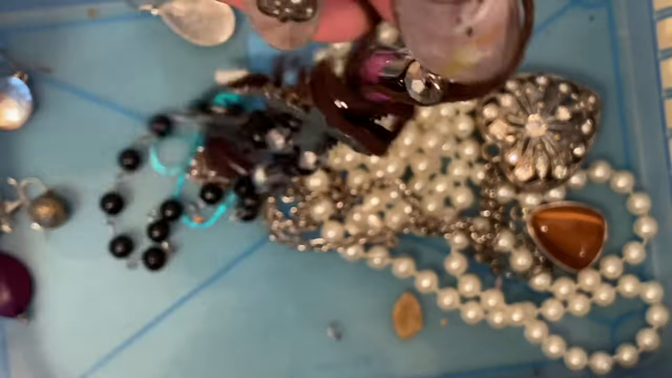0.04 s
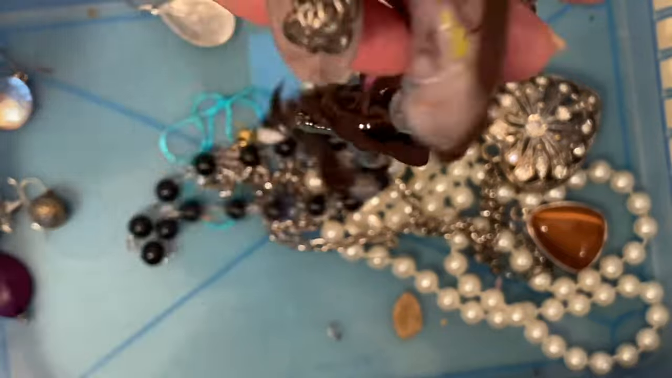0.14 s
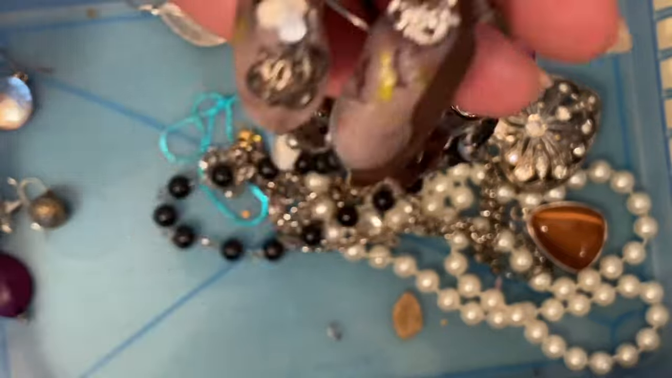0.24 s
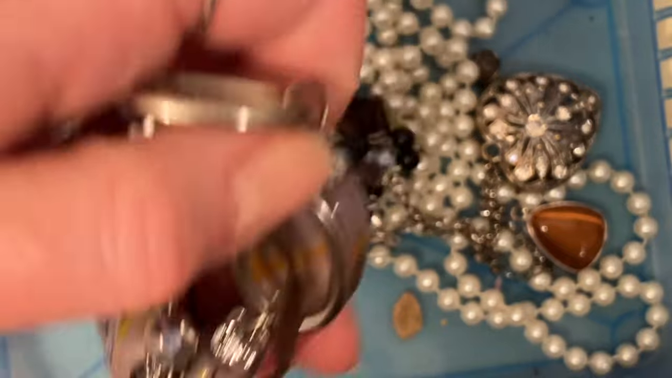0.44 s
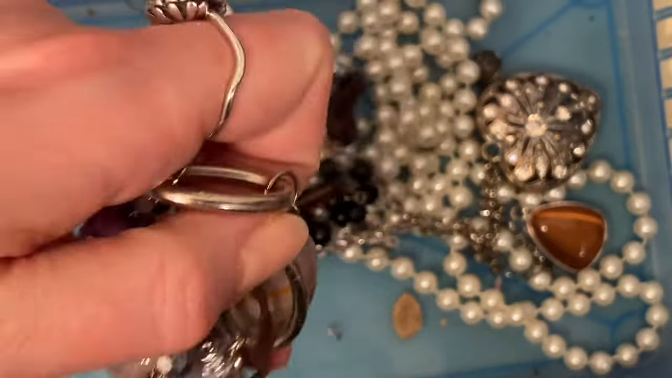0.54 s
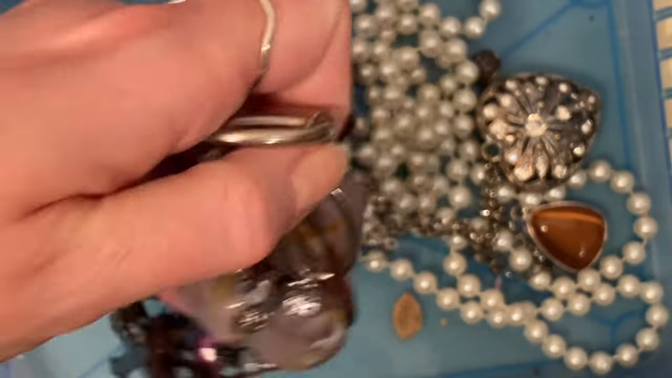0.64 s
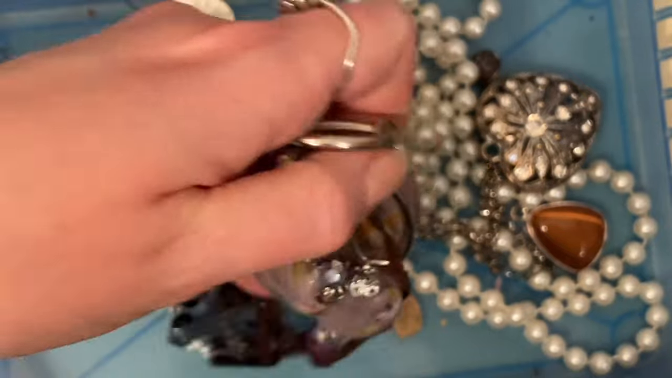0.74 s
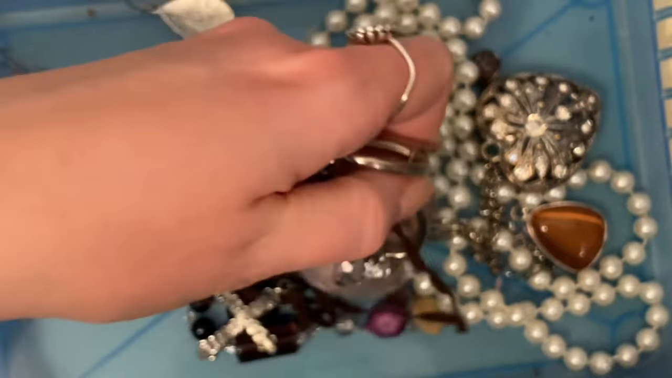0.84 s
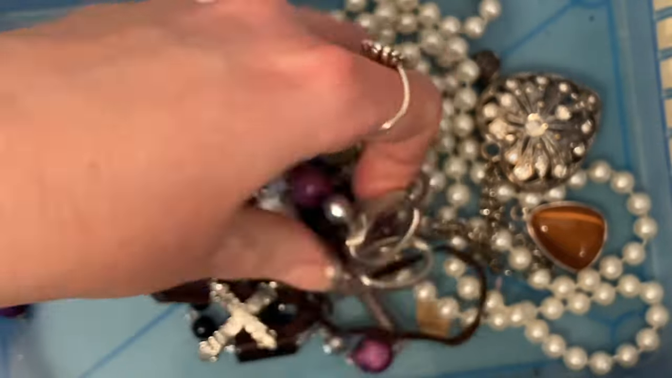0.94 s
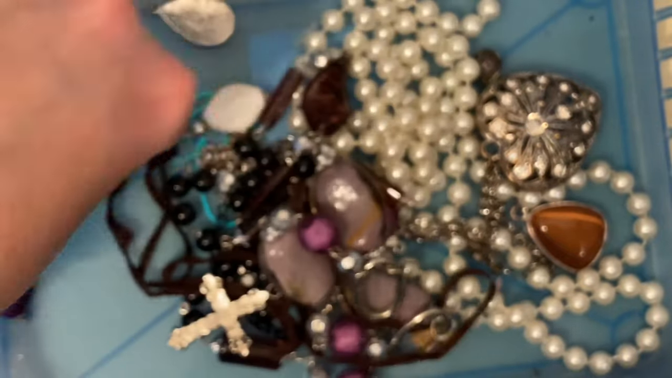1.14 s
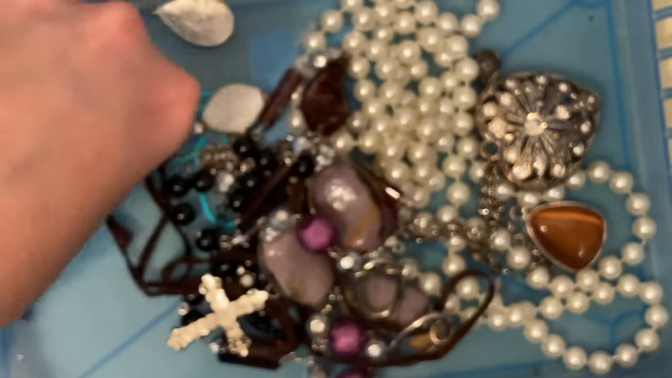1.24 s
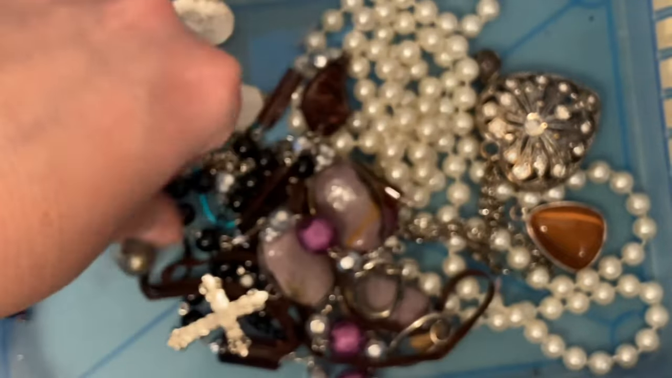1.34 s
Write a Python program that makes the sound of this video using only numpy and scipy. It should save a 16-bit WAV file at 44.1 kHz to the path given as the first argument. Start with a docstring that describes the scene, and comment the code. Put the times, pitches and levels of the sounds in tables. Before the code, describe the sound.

A handful of jewellery rattles and drops into a plastic tub with dense, bright clicks and low thumps

```python
"""Beads and chains in a plastic tub

A handful of beads, pearls and chains is lifted, turned and dropped in a plastic tub, close to a two-port
microphone. Each contact gives a short knock near 2 kHz, a noisy bright tick and a shiver of the heap.
Countless tiny damped sines rattle between them, and heavy pieces ring the tub floor in a few low modes.
A low murmur of the room lies underneath. The loudest contacts clip.
"""
import sys
import numpy as np
from scipy.fft import rfft, irfft, next_fast_len
from scipy.io import wavfile

SR = 44100
rng = np.random.default_rng(int(sys.argv[2]) if len(sys.argv) > 2 else 0)


def inscribe(sig):
    """Save sig as 16-bit PCM at rate SR to the path in sys.argv[1].

    A 1-D sig is mono; a 2-D sig holds one channel per row.
    Samples are clipped to [-1, 1] before scaling.
    """
    pcm = np.round(np.clip(np.atleast_2d(sig).T, -1, 1) * 32767)
    wavfile.write(sys.argv[1], SR, pcm.astype(np.int16))


N = 59535
TOP_HZ = 15700  # band limit of the microphone; no bead or link is pitched above it


def amp(db):
    """Decibels to gain."""
    return 10 ** (np.asarray(db) / 20)


def unit(x):
    """Scaled to rms 1."""
    return x / np.sqrt(np.mean(x ** 2) + 1e-20)


def along(points, hz):
    """Read (frequency, value) points on a log frequency axis."""
    point_hz, values = np.transpose(points)
    return np.interp(np.log(hz + 1), np.log(np.maximum(point_hz, 0) + 1), values)


def filtered(x, response):
    """x shaped by a complex response of frequency."""
    size = next_fast_len(N + 8192)  # spare room keeps the tail from wrapping round
    spectrum = rfft(x, size) * response(np.fft.rfftfreq(size, 1 / SR))
    return irfft(spectrum, size)[..., :N]


def noise(spectrum):
    """Coloured noise of rms 1."""
    white = rng.standard_normal(N)
    return unit(filtered(white, lambda hz: amp(along(spectrum, hz))))


def place(times, rows):
    """Sum short sounds, one per row, at their times in seconds."""
    starts = np.round(np.asarray(times) * SR).astype(int)[:, None]
    at = starts + np.arange(rows.shape[1])
    return np.bincount(at.ravel(), rows.ravel(), N + SR)[:N]


# The low murmur of the room: pitch_hz, level_db
ROOM_SPECTRUM = [(33, -11.5), (48, 1), (230, -17.5), (395, -5.5), (1500, -41)]
ROOM_DB = -45


def room():
    """Steady noise, coloured towards the lows."""
    return amp(ROOM_DB) * noise(ROOM_SPECTRUM)


def grains(per_s, hz, spread, cycles, size_db):
    """Random tiny collisions of rms 1, each a damped sine of its own pitch and size."""
    count = int(per_s * N / SR)
    start_s = rng.random(count) * N / SR
    draw = np.clip(rng.standard_normal((count, 2)), -2, 2)
    pitch_hz = np.minimum(hz * np.exp(spread * draw[:, :1]), TOP_HZ)
    turns = pitch_hz * np.arange(256) / SR
    decay = amp(size_db * draw[:, 1:] - 30 * turns / cycles)  # falls 30 dB in this many cycles
    shape = decay * (1 - np.exp(-2 * turns))
    return unit(place(start_s, shape * np.sin(2 * np.pi * turns)))


# Colour of the smooth rustle under the beads: pitch_hz, level_db
RUSTLE_SPECTRUM = [(1000, -12.5), (1900, -2.5), (3500, -6), (5000, -9.5), (15500, -51)]
RUSTLE_DB = -4.5  # against the patter


def beads():
    """An even patter of small bead knocks over a smooth rustle of noise."""
    patter = grains(per_s=700, hz=2050, spread=0.21, cycles=2.14, size_db=3)
    return patter + amp(RUSTLE_DB) * noise(RUSTLE_SPECTRUM)


# How strongly the handful stirs close to the microphone: start_s, beads_db, links_db
STIRRING = [(0, -31.5, -43.5), (.12, -35, -41), (0.32, -38.5, -49), (.47, -38.5, -41.5),
            (0.571, -18, -28.5), (.63, -28, -33.5), (.705, -29, -45), (0.759, -21.5, -25.5),
            (0.859, -30, -38.5), (0.939, -14.5, -16.5), (1.019, -25.5, -26.5), (1.12, -33.5, -45),
            (1.233, -49.5, -60), (1.26, -28.5, -40), (1.35, -51, -73)]


def rattle():
    """Beads and brighter chain links in ceaseless small collisions, swelling and easing."""
    start_s, beads_db, links_db = np.transpose(STIRRING)
    t = np.arange(N) / SR
    links = grains(per_s=4500, hz=8100, spread=0.43, cycles=8.3, size_db=13.5)
    bead_gain = amp(np.interp(t, start_s, beads_db))
    link_gain = amp(np.interp(t, start_s, links_db))
    return bead_gain * beads() + link_gain * links


KNOCK_RISE_S, KNOCK_T60_S = 0.00034, 0.0061
OVERTONE_HZ, OVERTONE_SPREAD = 3403, 0.1  # spread in natural-log units
TICK_T60_S = 0.0083
SETTLE_DB, SETTLE_T60_S = -17, 0.041  # the heap shivers after each contact
# Colour of the noisy tick: pitch_hz, level_db
TICK_SPECTRUM = [(3500, -4.5), (5500, 5), (15500, -7)]
# Clear contacts, piece on piece: start_s, knock_db, pitch_hz, overtone_db, tick_db
CLEAR_CONTACTS = [(0.0115, -21, 1920, -44, -29), (0.0913, -19.5, 2120, -27, -19),
                  (0.1099, -15.5, 2320, -23, -30), (0.122, -18, 2420, -18.5, -17),
                  (0.177, -14, 1970, -26, -30), (0.1966, -12.5, 2010, -16, -14),
                  (0.2014, -27, 2200, -27, -9.5), (0.2195, -12.5, 1760, -14, -21),
                  (0.2438, -13.5, 1950, -33, -19), (0.349, -32, 2590, -30, -12.5),
                  (0.3753, -10, 2030, -18, -12.5), (0.3875, -11.5, 1940, -21, -24),
                  (0.3947, -27, 1910, -14.5, -26), (0.4005, -11.5, 1870, -15, -19),
                  (0.4291, -20, 1860, -16, -17.5), (0.442, -26, 1620, -12.5, -16.5),
                  (0.4855, -10, 1930, -30, -42), (0.4971, -12, 2230, -16, -17),
                  (0.5045, -8, 1960, -22, -32), (0.5096, -8, 1900, -23, -31), (0.5122, -10, 2050, -14, -24),
                  (0.533, -5.5, 1760, -17, -22), (0.538, -5, 2020, -14, -18.5),
                  (0.5495, -6.5, 2050, -7.5, -23), (0.5587, -3.5, 2350, -18, -18),
                  (0.5628, -1, 1930, -15, -30), (0.5759, 3, 2000, -22, -8), (0.5859, -6.5, 1920, -7, -29),
                  (0.5894, 0.5, 2000, -8.5, -7.5), (0.61, -7.5, 2080, -9, -15),
                  (0.6372, -7.5, 1750, -23, -32), (0.6457, -11, 2110, -27, -35),
                  (0.652, -9, 1960, -17.5, -32), (0.6601, -10.5, 2020, -34, -32),
                  (0.671, -8.5, 2040, -19, -21), (0.7102, -8.5, 2140, -19, -18),
                  (0.7192, 3, 1920, -2, -4.5), (0.7277, -3.5, 2120, -7, -21), (0.7424, -8, 1880, 2, -9),
                  (0.7455, -5, 1830, -8, -10), (0.758, -2.5, 1860, -9, -4), (0.7888, 0, 1670, 0.5, -5.5),
                  (0.823, -11, 2340, -9, -17), (0.832, 2, 1846, 2, -16), (0.8398, -4, 1650, -9, -15.5),
                  (0.8746, -9, 1740, -15, -18), (0.8899, -8.5, 2150, -18, -23), (0.8974, 4.5, 1860, -3, -4),
                  (0.9019, -17, 1920, -8, -3), (0.907, -1, 2050, -15, -22), (0.932, 5.5, 1980, 1, -1),
                  (0.94, -14, 1930, -11, -3), (0.9496, -8, 1650, -21, -5), (0.9549, 1.5, 1900, -4, -20),
                  (0.9597, -4.5, 1670, -6, -9), (0.966, -14, 2190, -0.5, -8.5),
                  (0.9859, -7.5, 2240, -7, -8), (1.0292, -12, 1810, -12, -34),
                  (1.0624, -14, 1470, -12, -38), (1.0665, -16, 2670, -12, -29),
                  (1.0771, -15, 1510, -19, -19), (1.0827, -5.5, 1710, -2.5, -33),
                  (1.1429, -13, 1580, -14, -43), (1.1687, -19.5, 2640, -19.5, -29),
                  (1.2454, -12, 2070, -13.5, -20.5), (1.306, -18.5, 1690, -21, -34)]


def contacts():
    """A knock on its own pitch with a pair of overtones, a noisy tick, then the shiver of the heap."""
    columns = np.transpose(CLEAR_CONTACTS)
    start_s, knock_db, pitch_hz, overtone_db, tick_db = (c[:, None] for c in columns)
    times = start_s[:, 0]
    t = np.arange(SR // 10) / SR

    over_hz = OVERTONE_HZ * np.exp(OVERTONE_SPREAD * rng.standard_normal((len(times), 2)))
    overtones = sum(np.sin(2 * np.pi * over_hz[:, [k]] * t) for k in range(2)) / 2
    tone = amp(knock_db) * np.sin(2 * np.pi * pitch_hz * t) + amp(overtone_db) * overtones
    shape = amp(-60 * t / KNOCK_T60_S) * (1 - np.exp(-t / KNOCK_RISE_S)) ** 2
    knocks = place(times, shape / shape.max() * tone)

    ticks = place(times, amp(tick_db - 60 * t / TICK_T60_S)) * noise(TICK_SPECTRUM)

    strength = amp(knock_db) + amp(overtone_db)
    settling = strength * amp(SETTLE_DB - 60 * t / SETTLE_T60_S)
    shiver = place(times, settling) * beads()
    return knocks + ticks + shiver


MAIN = 3  # row of TUB_MODES whose pitch depends on where the floor is struck
RISE_TURNS, LAG_TURNS = 0.67, 1.7  # slow bending waves reach the low modes late
KNOCK_TO_TUB_DB = -29
# Ringing modes of the plastic floor: pitch_hz, level_db, t60_s
TUB_MODES = [(118, -4, 0.093), (215.6, -6, 0.097), (291.9, -10, 0.17), (390, 2.5, 0.051), (540, -1.5, 0.1),
             (742, 0, 0.049), (943, 0, 0.051)]
# Heavy pieces landing on the floor: start_s, level_db, deepest_mode_db, upper_modes_db, main_pitch_hz
HEAVY_THUMPS = [(0.373, -26.5, 0, -6, 372), (0.51, -26, -20, 0.5, 409), (.605, -29.5, 10, -6, 390),
                (.721, -19.5, 4, -6.5, 366), (.749, -19, -2, -6.5, 372), (0.829, -29, -7, 3.5, 356),
                (0.898, -19.5, -8, -3.5, 353), (.938, -12, 0, -5.5, 436), (0.978, -15.5, 0.5, -12, 390),
                (1.177, -17.5, -0.5, -12.5, 396), (1.245, -19.5, -1, -6.5, 406)]


def tub():
    """The floor rings under heavy pieces, its deep modes arriving late, and faintly under every contact."""
    main_mode_hz = TUB_MODES[MAIN][0]
    faint = [(c[0], c[1] + KNOCK_TO_TUB_DB, 0, 0, main_mode_hz) for c in CLEAR_CONTACTS]
    columns = np.transpose(list(HEAVY_THUMPS) + faint)
    start_s, level_db, deepest_db, upper_db, main_hz = (c[:, None] for c in columns)
    draw = rng.standard_normal((len(start_s), 2 * len(TUB_MODES)))
    ring = 0
    for k, (hz, mode_level_db, t60_s) in enumerate(TUB_MODES):
        lag_s = LAG_TURNS * max(1 / hz - 1 / main_mode_hz, 0)
        t = np.maximum(np.arange(SR // 5) / SR - lag_s, 0)
        # every strike varies each mode by about 1 dB
        mode_db = mode_level_db + deepest_db * (k == 0) + upper_db * (k > MAIN) + draw[:, [2 * k]]
        swell = amp(-60 * t / t60_s) * (1 - np.exp(-t * hz / RISE_TURNS)) ** 2
        pitch_hz = main_hz if k == MAIN else hz * np.exp(.05 * draw[:, [2 * k + 1]])
        ring = ring + amp(mode_db) * swell * np.sin(2 * np.pi * pitch_hz * t)
    return place(start_s[:, 0], amp(level_db) * ring)


SMALL_HZ = 860


def small_pieces(x):
    """Pieces this small radiate little low sound: a two-stage high-pass."""
    def radiation(hz):
        ratio = 1j * hz / SMALL_HZ
        return (ratio / (1 + ratio)) ** 2
    return filtered(x, radiation)


LEAD_S = 5.2e-5  # the left port is nearer
# Further phase by which the left port leads: pitch_hz, lead_radians
PORT_LEAD = [(300, -.1), (1120, -.95), (2500, -.1), (4100, -.9), (5000, .6), (5600, -.2), (8000, .1)]
# Balance of the two ports: pitch_hz, left_over_right_db
PORT_BALANCE = [(170, 0), (600, 6.5), (1300, 0)]
# Sound the ports do not share: pitch_hz, level_db
PORT_DIFFERENCE = [(200, -34), (700, -13), (2000, -22), (4500, -9), (15000, -7)]


def ports(x):
    """One sound at two ports: a lead, a balance, and a small scattered part of opposite sign."""
    side = np.array([[1], [-1]])  # left, right
    smear = unit(rng.standard_normal(900) * amp(np.linspace(0, -30, 900))) / 30  # energy 1
    scattered = filtered(np.convolve(x, smear)[:N], lambda hz: amp(along(PORT_DIFFERENCE, hz)))

    def port_response(hz):
        lead = 2 * np.pi * hz * LEAD_S + along(PORT_LEAD, hz)
        return amp(side * along(PORT_BALANCE, hz) / 2) * np.exp(.5j * side * lead)
    return filtered(x + side * scattered, port_response)


def scene():
    """Jewellery, tub and the low murmur of the room, heard at the two ports."""
    jewellery = small_pieces(rattle() + contacts())
    return ports(room() + jewellery + tub())


CLIP, HARDNESS = 1.05, 12  # ceiling in full scales; a higher hardness bends more sharply


def record(dry):
    """Loud peaks clip; little passes above the band limit."""
    clipped = dry / (1 + np.abs(dry / CLIP) ** HARDNESS) ** (1 / HARDNESS)
    limited = filtered(clipped, lambda hz: np.where(hz < TOP_HZ, 1, .03))
    return np.clip(limited, -1, 1)


dry = scene()
out = record(dry)
inscribe(out)
```